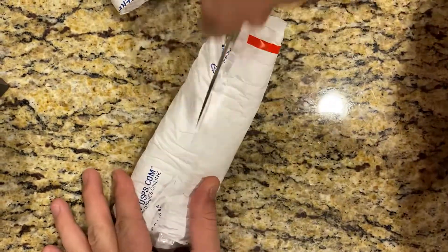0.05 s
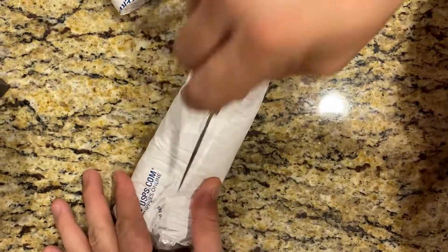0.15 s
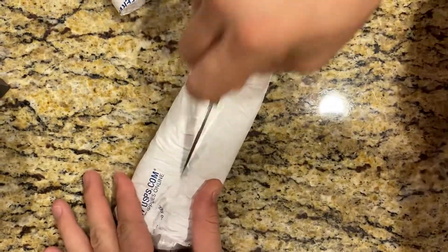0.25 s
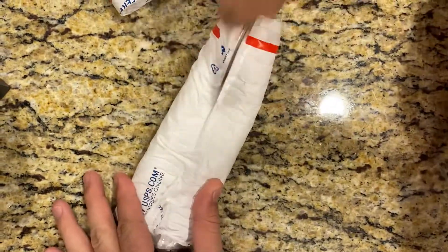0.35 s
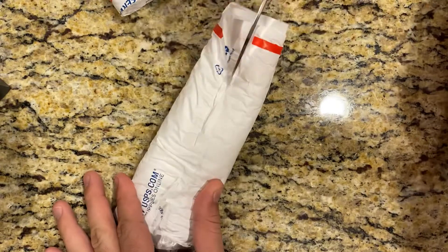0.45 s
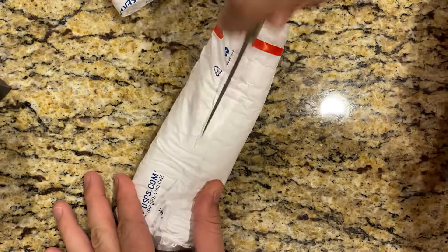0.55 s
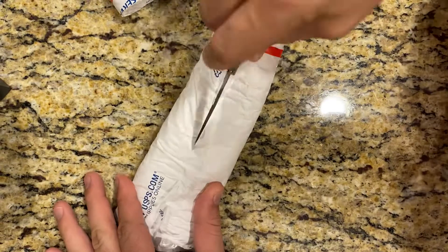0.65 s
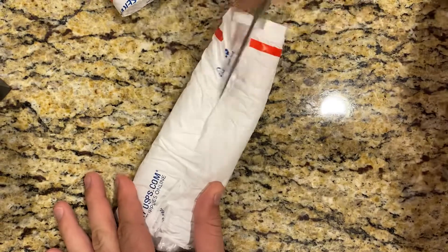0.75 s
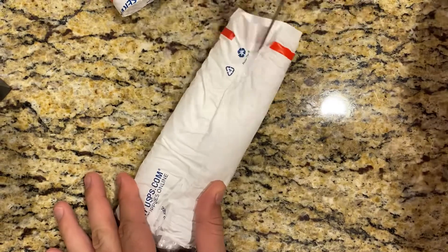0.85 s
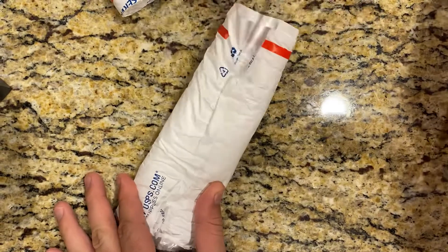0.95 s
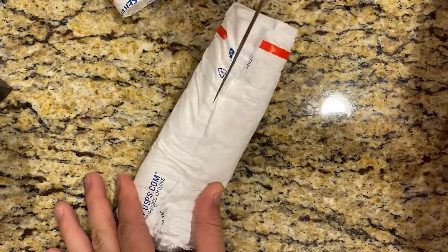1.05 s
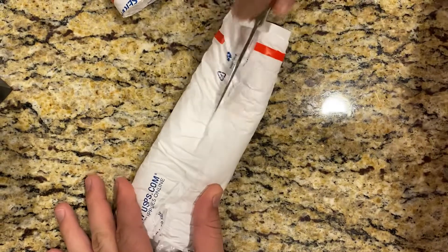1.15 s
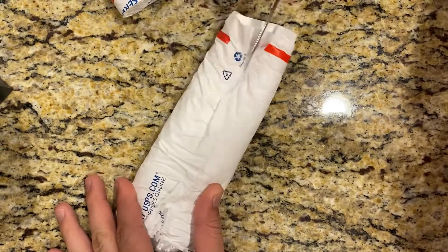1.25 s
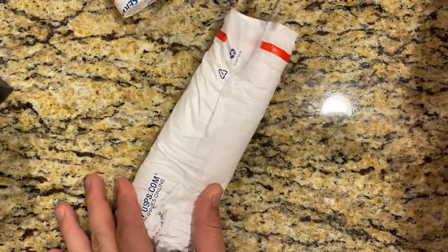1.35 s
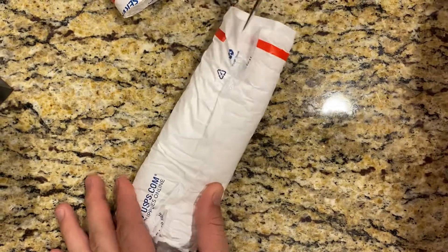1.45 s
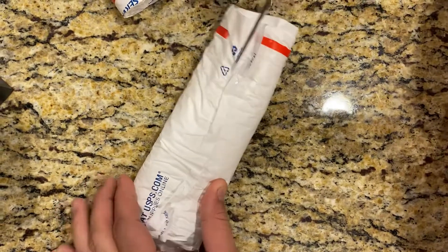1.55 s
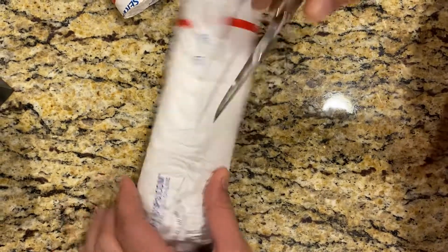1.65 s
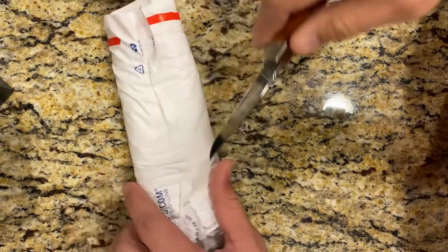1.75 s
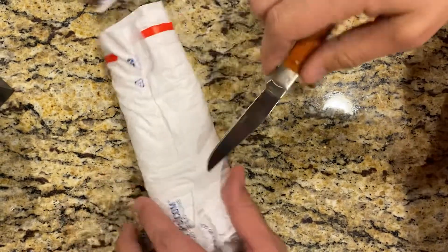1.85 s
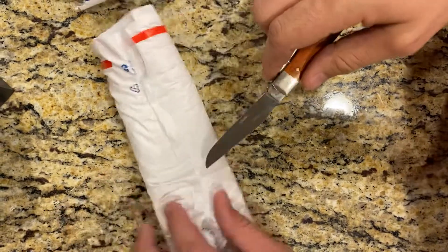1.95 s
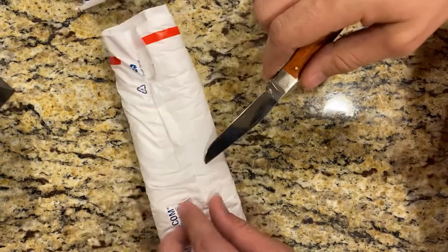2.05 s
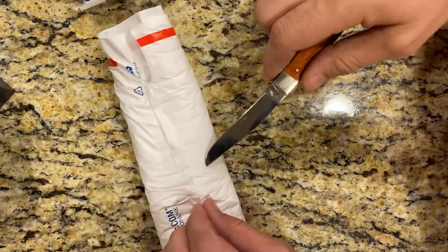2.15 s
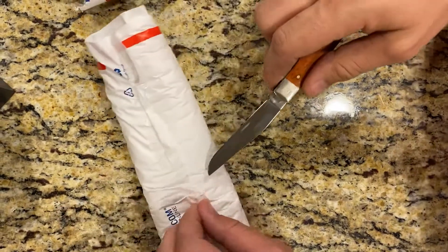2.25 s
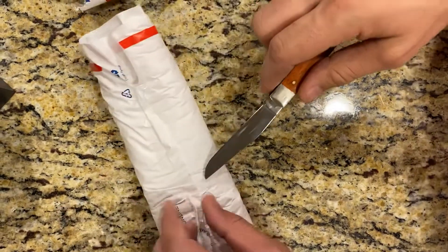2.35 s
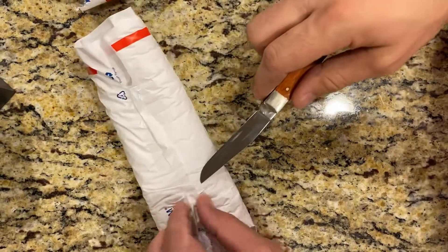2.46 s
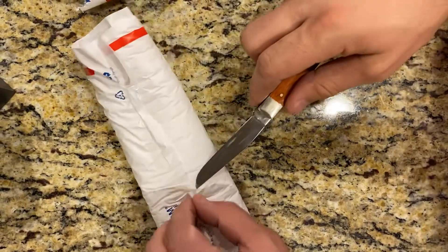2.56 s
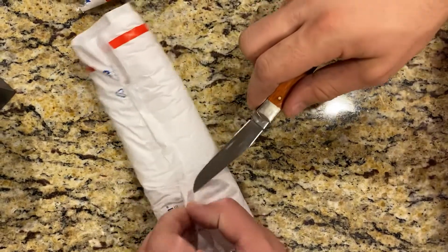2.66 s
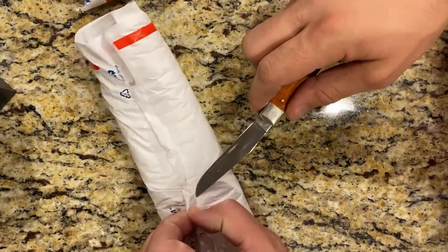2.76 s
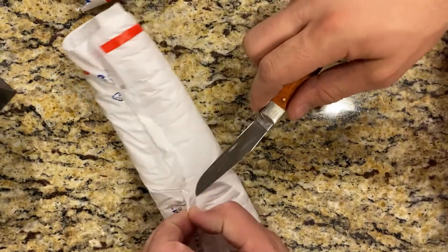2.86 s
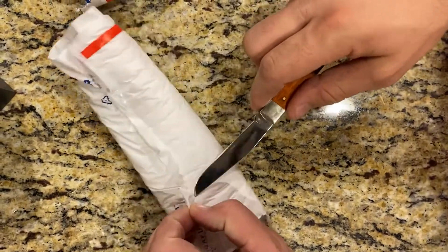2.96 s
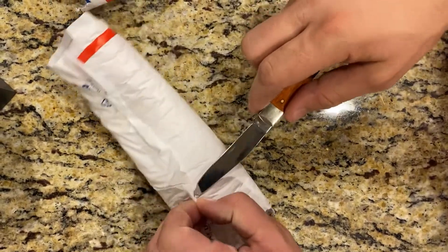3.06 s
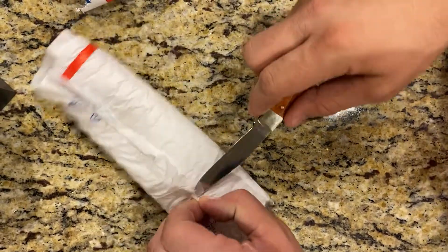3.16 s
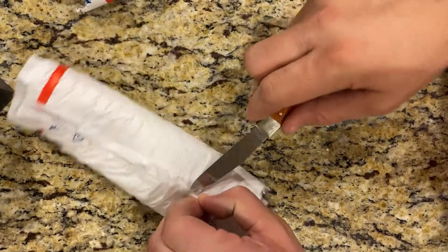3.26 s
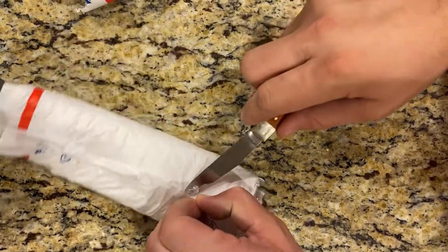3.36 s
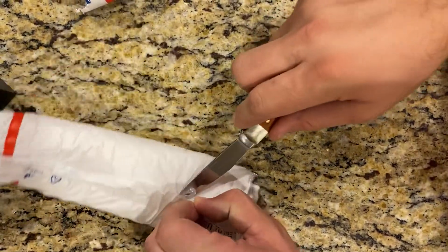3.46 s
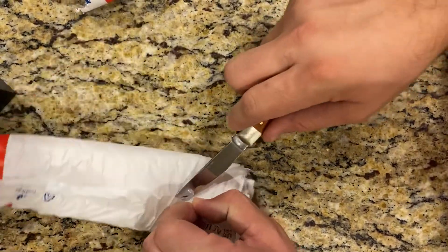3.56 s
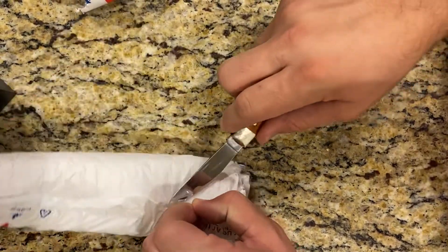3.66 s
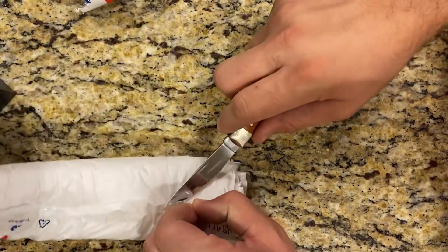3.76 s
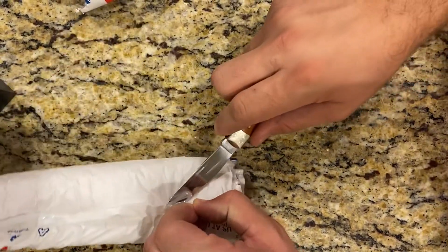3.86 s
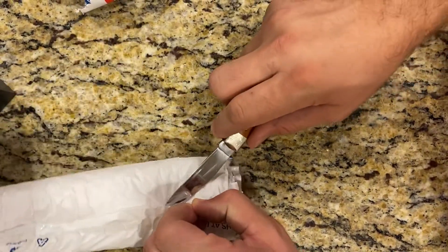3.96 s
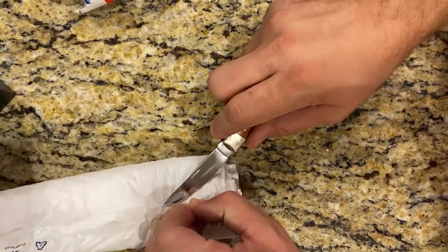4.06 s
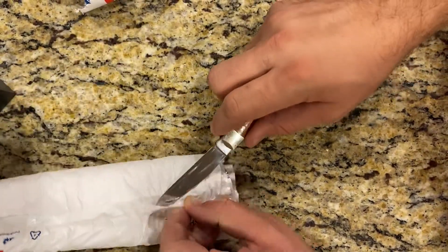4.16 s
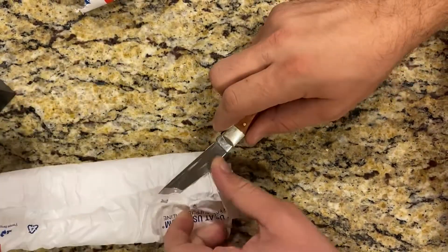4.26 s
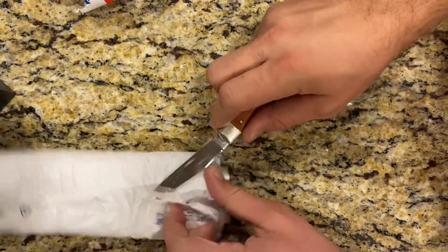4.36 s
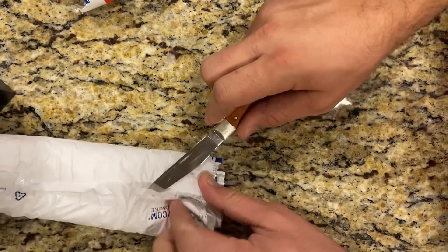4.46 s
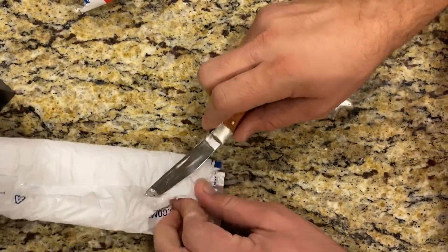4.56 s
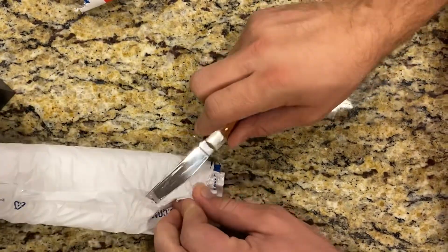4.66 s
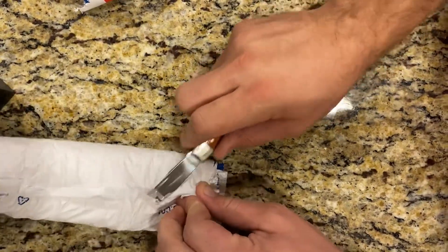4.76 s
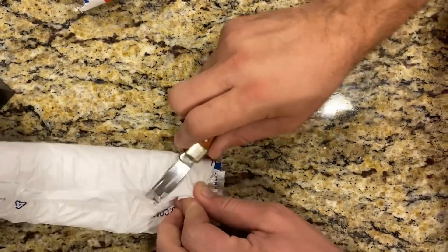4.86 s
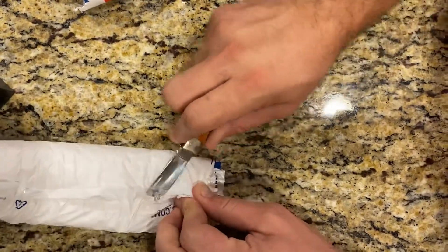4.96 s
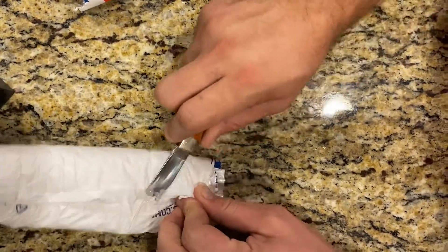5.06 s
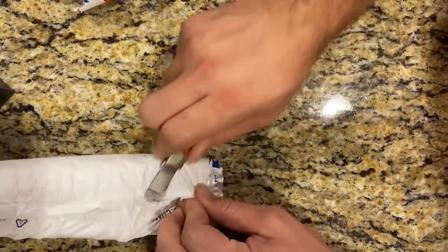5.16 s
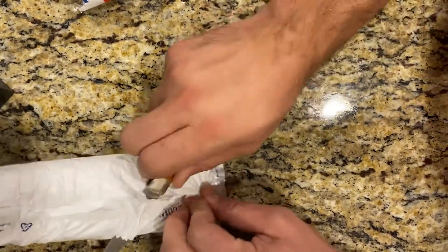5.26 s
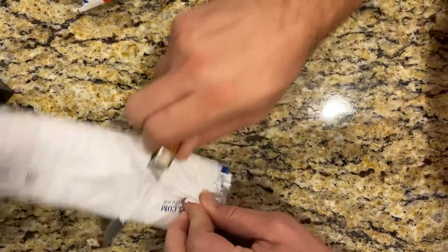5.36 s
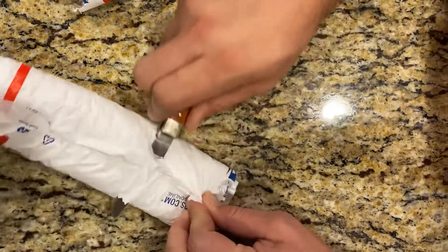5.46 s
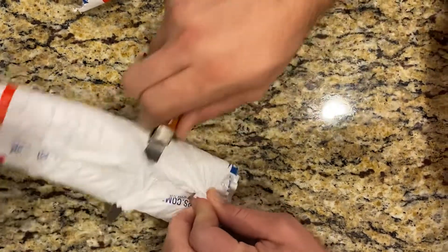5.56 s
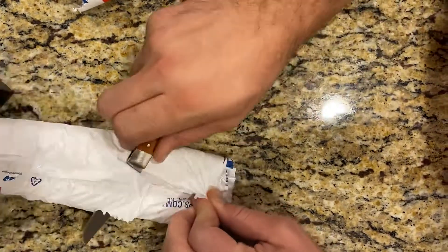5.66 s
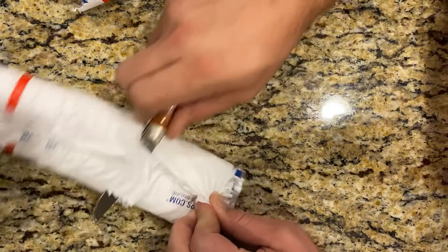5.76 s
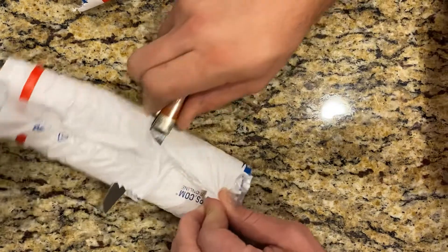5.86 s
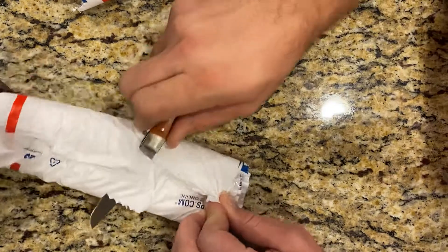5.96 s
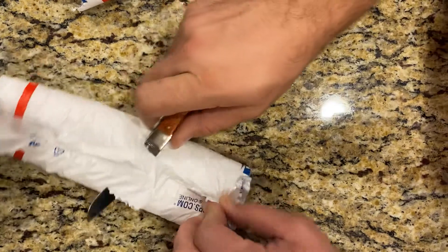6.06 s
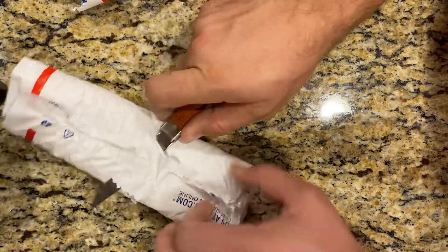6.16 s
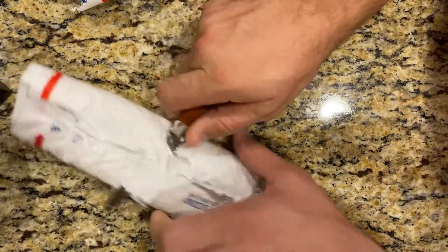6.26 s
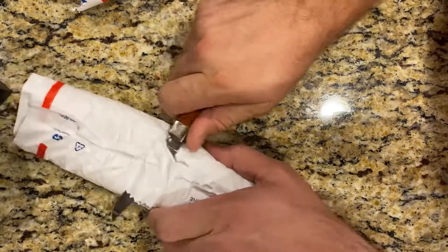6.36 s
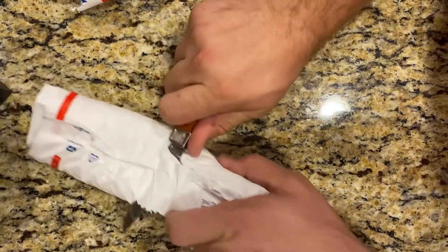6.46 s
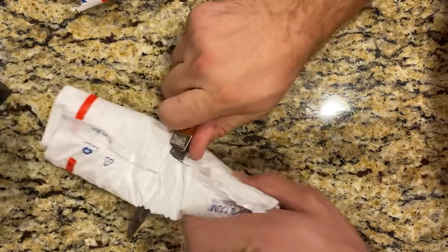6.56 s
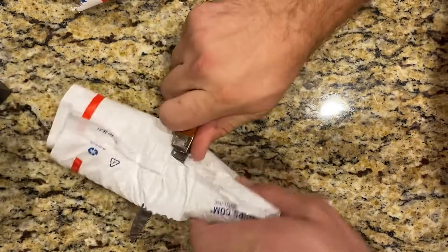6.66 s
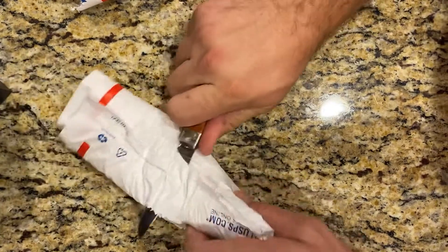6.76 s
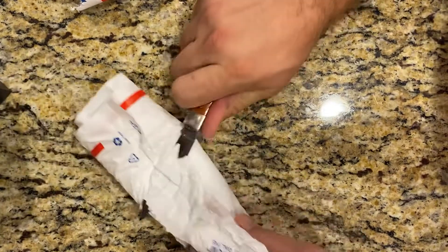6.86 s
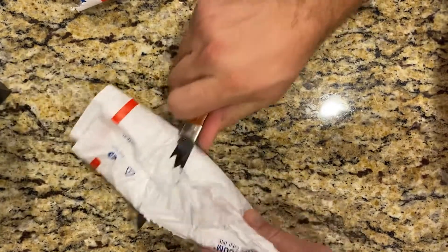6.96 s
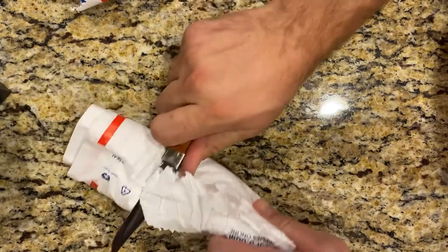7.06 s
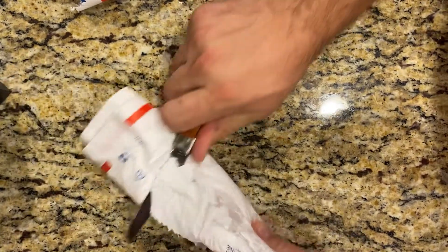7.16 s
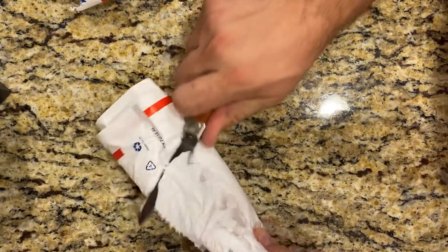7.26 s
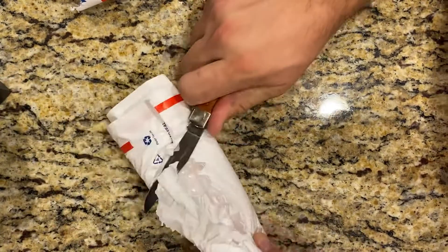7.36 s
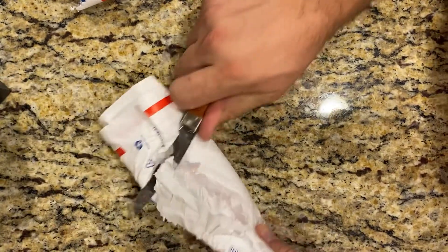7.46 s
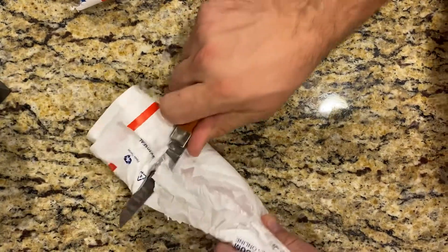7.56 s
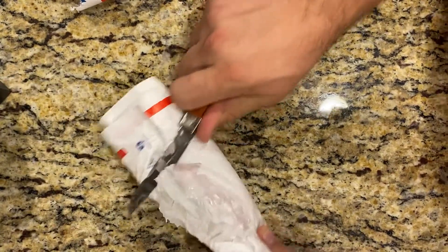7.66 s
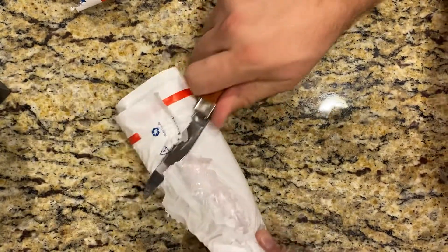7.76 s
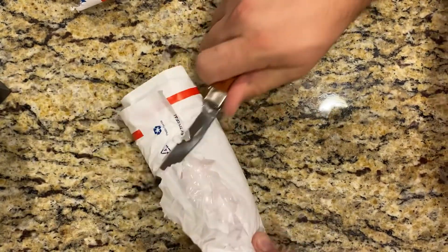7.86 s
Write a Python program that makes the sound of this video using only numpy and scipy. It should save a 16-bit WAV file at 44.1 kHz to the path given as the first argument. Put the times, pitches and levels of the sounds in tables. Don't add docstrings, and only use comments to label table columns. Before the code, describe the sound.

A padded plastic mailer is cut open on a stone kitchen counter. Brisk slicing crackles and snaps come first, then quiet sparse picking at the tape, then firmer piercing and twisting, and finally the loudest bursts as the blade saws through. Small air pockets pop throughout. Very close stereo pickup, short kitchen reverberation, and a barely audible low appliance hum.

```python
import sys
import numpy as np
from scipy import signal
from scipy.fft import rfft, irfft
from scipy.io import wavfile
from scipy.ndimage import uniform_filter1d

SR = 44100
rng = np.random.default_rng(int(sys.argv[2]) if len(sys.argv) > 2 else 0)


def materialize(psi):
    bounded = np.clip(np.atleast_2d(psi).T, -1, 1)
    quanta = np.round(bounded * 32767).astype(np.int16)
    wavfile.write(sys.argv[1], SR, quanta)


def volts(x):
    e = np.asarray(x, float) / 20
    return 10 ** e


N = 348816

# peak_s, snap_db, hollow_body_db (rel), crisp_edge_db (rel)
SLICE_SNAPS = [(.0033, -32.5, 2, -8), (0.0673, -35, -10, -26), (0.0751, -45, 2, 8.5),
               (0.1885, -33.5, 0, 2.5), (0.2606, -49.5, 8, 16), (0.304, -30, -25, -9),
               (0.3138, -23, -31, -27), (.352, -24.5, -12.5, -29), (.466, -42.5, 10, 7),
               (0.472, -40, -9, -22), (0.6304, -31.5, -9, -12), (0.6372, -37.5, 5, -7),
               (0.6506, -27, -9, -24), (0.6956, -28.5, -15, -2), (0.7148, -39, -3, 11),
               (.7287, -41, -12, -16), (0.7573, -28, -6, -18), (0.78, -37, -3, -4), (1.0985, -42.5, 3, -10),
               (1.1113, -38, 5, -8), (1.1548, -27.5, -7, -15), (1.1812, -28, -27, -11),
               (1.189, -35.5, -1, 4), (1.2075, -34, -10, -20), (1.219, -28, -8, -32),
               (1.3098, -34.5, -2.5, -1), (1.3306, -29.5, -5.5, -5), (1.3695, -33.5, -0.5, -11)]
PICK_SNAPS = [(1.642, -48.5, 13.5, 0), (1.746, -60.5, 19.5, -12), (1.9517, -37.5, 6.5, -40),
              (2.017, -45, -3, -18), (2.102, -37, -4, -13), (2.1066, -46, 1, -22), (2.154, -43, -14, 0),
              (2.3026, -48.5, 6.5, -29), (2.491, -50, 11, -16), (2.5051, -41, 4, -29), (2.586, -58, 8, -17),
              (2.6081, -33, -7, -22), (2.6418, -48, -12, 4), (2.7837, -37.5, -11.5, -19),
              (2.872, -49, -11, 10.5), (3.0614, -33, -8, 1.5), (3.1193, -46.5, -0.5, 3),
              (3.237, -61, 12, 19), (3.301, -46, -26, -2), (3.318, -46, -20, -6), (3.373, -40, -29, -7),
              (3.5502, -46.5, -22, 4.5), (3.571, -43, -6, -28), (3.6043, -40, -10, 8), (3.67, -48, -24, 1),
              (3.744, -45, 5, -10), (3.8129, -42, -4.5, -4), (3.866, -51, -30, 5), (3.949, -50, -17, 7.5)]
PIERCE_SNAPS = [(4.094, -42, -10, -1), (4.128, -33.5, -6, 7), (4.1595, -39, 7, 8), (4.1743, -49, 17.5, -6),
                (4.2083, -42.5, 0.5, -1), (4.265, -48, -19, 7.5), (4.342, -36.5, 1.5, -21),
                (4.473, -38.5, 4, 3.5), (4.54, -43, 2, 12), (4.5549, -35, -0.5, -5), (4.5988, -42, 3, 2),
                (4.6423, -38, 0, 2), (4.6548, -40.5, 5, 14.5), (4.684, -26.5, -5.5, 9.5),
                (4.7079, -28.5, -21, 9), (4.909, -29, -2.5, -14), (4.9445, -37, -10, -10),
                (4.965, -34.5, -10, -11), (5.042, -25, -38, -2), (5.0582, -36, -4, -18),
                (5.0754, -28.5, -8, -6), (5.145, -36.5, 6, 0), (5.1726, -40, 6, 5),
                (5.1793, -40.5, 11, -14), (5.241, -37, -19, 3), (5.314, -32.5, -10, -2),
                (5.4021, -31.5, 9, 8), (5.423, -34, 1.5, -14.5)]
TWIST_SNAPS = [(5.535, -32, -20, -5), (5.572, -31, 5, 5), (5.5749, -38, 18, 8.5), (5.597, -39, 16.5, -23),
               (5.6055, -28, 14.5, 5), (5.643, -45, 13, 10), (5.76, -37.5, -12, 12), (5.78, -49, -18, 24),
               (5.9101, -40.5, 8.5, -25), (5.9357, -28, 0.5, -15), (5.982, -53, 15.5, -25),
               (6.0534, -38.5, 2, -11), (6.242, -42.5, 8, -31), (6.2712, -40.5, 11, -19),
               (6.334, -36, 5, -7), (6.421, -39, -18, 8), (6.4562, -32, -2, 7), (6.4905, -24.5, -2.5, -6.5),
               (6.506, -23, -14, -28.5), (6.513, -20.5, -11, -5), (6.5306, -23, -4.5, -34),
               (6.549, -26, 0, -2)]
SAW_SNAPS = [(6.7671, -24, -10, -18), (6.772, -18.5, 2.5, -25), (6.7837, -21, -20, -29),
             (6.7926, -23, 3.5, -25), (6.8012, -18, -5, -19), (6.8171, -23, -3, -7),
             (6.8351, -21.5, 2.5, 1.5), (6.845, -20, -11, -16), (6.8538, -27, 6.5, 5.5),
             (6.928, -48, -12, 22), (6.964, -37.5, 7, 20.5), (6.972, -43, 18, 8), (7.001, -39, 10, 14.5),
             (7.0961, -33.5, -6, 7), (7.1303, -42, 9, 8), (7.198, -19, 4.5, -2.5), (7.2236, -20, -0.5, -8),
             (7.2395, -24, -1, -10), (7.247, -24, 5.5, -3.5), (7.2511, -21, -1, -17),
             (7.3601, -38.5, 7.5, 5.5), (7.4865, -25.5, -4.5, -13), (7.503, -28, -11, -2.5),
             (7.5124, -28.5, 0.5, 1), (7.537, -31, -31, 0), (7.642, -27.5, -22, 1), (7.651, -32, -2.5, 4),
             (7.699, -27.5, -5, 1), (7.7192, -29.5, -13, -10), (7.7551, -30, -8, 4), (7.845, -37, 2, 6)]
# peak_s, snap_db, hollow_body_db, crisp_edge_db
TAPE_SNAPS = [(1.054, -47, -26, 2.6), (2.8849, -55, -10, 5.8), (3.2537, -44.5, -12, 5),
              (3.5842, -51, -8, 2), (3.8827, -47, -17, 5.6)]
# peak_s, snap_db, hollow_body_db, crisp_edge_db
LONE_TICKS = [(1.813, -48, -7, -13), (2.9, -45, -12, -9), (2.958, -47, -23, -14), (3.339, -54, -20, 6),
              (3.351, -52, -16, 10), (3.385, -48, -3, -6), (3.641, -49.5, -8, 5), (3.849, -52, -15, 4),
              (4.496, -42.5, -2, -4), (6.129, -47, -12, 6), (2.704, -46.5, -4, -12)]
ALL_SNAPS = TAPE_SNAPS + SLICE_SNAPS + PICK_SNAPS + PIERCE_SNAPS + TWIST_SNAPS + SAW_SNAPS

# peak_s, effort_db, swell_s, fade_s, hollowness_db; swell and fade each span 20 dB
SLICE_STROKES = [(0.0, -35.5, .05, 0.056, -6), (0.198, -47.5, 0.018, 0.4, -1),
                 (0.317, -30, 0.097, 0.15, -8.5), (.46, -59.5, 0.37, 0.048, 15.5),
                 (0.633, -32, 0.0044, 0.028, -10), (0.733, -30.5, 0.08, 0.21, -5),
                 (.9, -41, 0.15, 0.081, -7), (1.108, -33.5, 0.019, 0.031, -4),
                 (1.195, -33, 0.09, 0.18, -6.5), (1.35, -49.5, 0.15, 0.24, 2.5)]
PICK_STROKES = [(1.678, -50.5, 0.34, 0.28, -2.5), (1.96, -49.5, 0.021, 0.12, 3.5),
                (2.093, -47, 0.14, 0.18, -3), (2.32, -51.5, 0.087, 0.27, -7), (2.49, -47.5, 0.08, 0.1, -5),
                (2.634, -46.5, 0.39, 0.18, -2), (2.963, -48, 0.2, 0.12, -5),
                (3.12, -54.5, 0.12, 0.21, -0.5), (3.397, -55, 0.45, 0.81, -5.5),
                (3.607, -54.5, 0.068, 0.14, -1), (3.83, -64.5, 0.14, 1, -4)]
PIERCE_STROKES = [(4.176, -43.5, 0.11, 0.061, -6), (4.416, -43.5, 0.25, 0.67, -5.5),
                  (4.692, -30, 0.016, 0.068, -3), (4.93, -55.5, 0.071, 0.46, -3.5),
                  (5.182, -31.5, 0.12, 0.09, -4), (5.3, -38.5, 0.072, 0.42, -6.5),
                  (5.417, -40.5, 0.19, 0.073, 1)]
TWIST_STROKES = [(5.583, -33, 0.073, 0.061, 0), (5.748, -42, 0.15, 0.12, -4), (5.928, -42, 0.13, 0.052, 2),
                 (6.136, -42.5, 0.25, 0.13, -4), (6.341, -35.5, 0.14, 1, -3)]
SAW_STROKES = [(6.526, -30, 0.049, 0.062, -5), (6.67, -43.5, 0.064, 0.45, -8),
               (6.775, -24.5, 0.0087, 0.1, -2.5), (6.836, -28, 0.041, 0.018, 6.5),
               (7.019, -32, 0.19, 0.046, -4.5), (7.13, -37, 0.12, 0.074, -10),
               (7.254, -30, 0.14, 0.1, -4.5), (7.51, -36.5, 0.17, 0.027, -3),
               (7.653, -34, 0.095, 0.097, -6.5), (7.88, -39, 0.23, 0.31, -0.5)]
# crisp_edge_db (rel), counter_thud_db (rel)
ACTION_COLOURS = [
    (-8, -8.5),
    (-4.5, -11),
    (-5, -15.5),
    (-5.5, -28),
    (-6.5, -13),
]
# level_db of thud, body, middle, edge
CREEP_DB = [-81, -91.5, -95.5, -82]

# peak_s, level_db, pitch_hz
POCKET_POPS = [(0.0095, -29, 1453), (0.068, -27.5, 2070), (0.186, -37, 1152), (0.198, -30, 1424),
               (0.2617, -24, 1122), (0.296, -26, 2330), (0.2955, -33, 387), (0.3148, -31, 4070),
               (0.316, -33, 296.6), (0.463, -31, 2800), (0.467, -34.5, 572.2), (0.6316, -29, 3600),
               (0.633, -24.5, 553), (0.6397, -25, 1980), (0.648, -25, 860), (0.6495, -29, 3540),
               (0.649, -21, 1486), (0.7293, -24, 3360), (0.7763, -32.5, 342), (0.7802, -27, 1340),
               (0.945, -31, 2840), (0.948, -33, 2300), (1.099, -25.5, 437), (1.112, -26, 1980),
               (1.1811, -21, 3020), (1.1834, -25, 780), (1.1883, -26, 5210), (1.208, -26, 391),
               (1.22, -34, 2230), (1.31, -28, 5400), (1.33, -28, 4040), (1.3302, -26, 4700),
               (1.376, -29.5, 536), (1.7474, -39, 1296), (1.9481, -27.5, 1900), (2.106, -32, 1004),
               (2.3005, -37, 614), (2.307, -33, 1870), (2.5056, -28, 1770), (2.507, -27.5, 1120),
               (2.5068, -32.5, 2320), (2.5693, -30.5, 1117), (2.61, -32.5, 557), (3.061, -29.5, 3570),
               (3.0606, -32.5, 2140), (3.1216, -32.5, 1120), (3.236, -39, 560), (3.8124, -38.5, 3960),
               (4.1605, -26.5, 739), (4.4734, -30, 1720), (4.5317, -37, 1060), (4.6839, -28, 5070),
               (4.685, -23, 3830), (4.6875, -25, 2080), (4.6898, -28, 4870), (4.69, -22.5, 1012),
               (4.7093, -18.5, 3130), (4.7083, -26, 3730), (4.7202, -22, 1800), (4.91, -26, 2070),
               (5.0417, -31, 4900), (5.042, -27.5, 3170), (5.0438, -34, 943), (5.0585, -37, 3140),
               (5.0732, -22.5, 3230), (5.073, -24.5, 4260), (5.074, -28, 950), (5.14, -28, 643),
               (5.176, -20.5, 5140), (5.1776, -23, 1810), (5.177, -23, 1072), (5.179, -30, 3570),
               (5.182, -24, 990), (5.2082, -25.5, 1810), (5.4012, -24, 3750), (5.401, -21.5, 1942),
               (5.4243, -29, 2100), (5.4445, -32, 1660), (5.5773, -29, 3360), (5.599, -38, 2210),
               (5.6052, -16, 2140), (5.6056, -20, 5420), (5.9118, -29, 1027), (6.1979, -33, 998),
               (6.2413, -31, 1930), (6.336, -20.5, 820), (6.4913, -17, 1350), (6.514, -14, 1826),
               (6.5155, -22, 1007), (6.5294, -14, 4950), (6.529, -13.5, 1282), (6.5477, -13, 1213),
               (6.6145, -27, 2150),
               (6.772, -12.5, 2340), (6.7836, -23.5, 2250), (6.7932, -8.5, 976), (6.793, -19, 2410),
             (6.791, -14, 3386), (6.7965, -14, 300), (6.799, -24, 690), (6.807, -37, 3500),
             (6.818, -21, 5170), (6.8361, -18, 5130), (6.8363, -10.5, 2350), (6.837, -8, 1160),
             (6.82, -13, 1100), (6.847, -15, 1030), (6.854, -19, 2530), (6.8553, -21.5, 5480),
             (6.9653, -12, 1075), (6.975, -25, 950), (6.9755, -23, 1810), (7.0003, -21, 1107),
             (7.023, -21, 960), (7.035, -25.5, 720), (7.097, -26, 4570), (7.124, -27, 4520),
             (7.1234, -29, 2020), (7.131, -27, 4740), (7.1304, -25, 4320), (7.131, -30, 819),
             (7.196, -19.5, 2500), (7.21, -25, 750), (7.2236, -15.5, 4940), (7.248, -18, 3320),
             (7.2515, -22, 4560), (7.486, -26, 3030), (7.501, -30, 2300), (7.6508, -20.5, 1120),
             (7.6511, -28, 3700), (7.6566, -30, 2450), (7.699, -18.5, 3610), (7.6995, -20, 1030),
             (7.72, -22, 1108), (7.847, -26.5, 4620), (7.8603, -19.5, 1033)]

# freq_hz, level_db
FILM_COLOUR = [(50, -39), (130, -12), (300, -1.5), (480, -6), (1050, 0), (1700, -2), (2200, -1),
               (2700, -4.5), (5000, -3), (7000, -2.5), (10000, -6.5), (15300, -10), (16200, -39),
               (17000, -45)]
# pitch_hz, width_hz, level_db
POCKET_RINGS = [(592, 135, 4), (1005, 380, -5), (2410, 210, -0.5)]
# freq_hz, right_phase_rad, right_level_db, unshared_part (0-1)
PORTS = [(0, 0, -.9, .03), (130, .06, 0, .02), (350, .12, 0, .05), (700, .12, -1.3, .07),
         (1200, .5, -2.5, .2), (1900, .1, -.3, .1), (2350, .3, 2, .33), (2620, -.7, 3.3, .75),
         (3300, -.7, 1.5, .45), (4900, -.23, .8, .33), (5700, -1.2, 0, .25), (7300, -3.14, 0, .2),
         (13600, -9.42, 0, .24), (16500, -12.4, 0, .3)]
# freq_hz, t60_s
KITCHEN_DECAY = [(250, 0.54), (900, 0.41), (6000, 0.31), (14000, 0.015)]
# time_s, level_db
HUM_LEVEL = [(0.0, -77), (0.769, -64.5), (4.25, -66), (4.7, -75), (5.2, -64), (5.65, -61.5), (6.14, -72.5),
             (7.14, -61), (7.91, -65.5)]
# freq_hz, level_db
HUM_COLOUR = [(30, -10), (80, 5), (150, -4), (300, -2.5), (600, -61), (3000, -64)]

GRAIN, LEAD = 1024, 200
THUD_HZ, BODY_HZ, EDGE_HZ = 500, 1500, 6800
PRESS, CRISP = 0.77, 0.15
POP_S, POP_CYCLES = 0.00078, 0.42
POP_RISE, POP_SAG = 0.83, 27
ROOM_DB = -19


def snaps(table):
    out = np.zeros(N + GRAIN)
    shapes = creases(count=len(table), slips=1.2, spread_s=.0011, shiver_db=-21, shiver_s=0.0019, bend_s=.0013)
    power = uniform_filter1d(shapes ** 2, size=66)
    thuds, bodies = hands(np.transpose(table)[0])[:2]
    for (s, db, body_db, edge_db), shape, p, thud, body in zip(table, shapes, power, thuds, bodies):
        zone_db = np.array([body_db + thud - body + 0.5, body_db, 0, edge_db])
        gain = volts(db + zone_db) / np.sqrt(p.max(-1))
        add(out, s + (GRAIN - p[2].argmax()) / SR, gain @ shape)
    return out[GRAIN:]


def creases(count, slips, spread_s, shiver_db, shiver_s, bend_s):
    t = (np.arange(GRAIN) - LEAD) / SR
    hz = np.fft.rfftfreq(GRAIN, 1 / SR)
    luck = rng.random((count, GRAIN + 4))
    noise = rng.standard_normal((count, GRAIN))
    slip = noise * (luck[:, 4:] < slips / (spread_s * SR)) * np.exp(-np.maximum(t, -2.2 * t) / spread_s)
    slip[:, LEAD] = np.sign(noise[:, 0]) * 1.39
    shiver = volts(shiver_db) * noise[:, ::-1] * np.exp(-np.maximum(t, -1.6 * t) / shiver_s)
    path_s = bend_s * (.5 + luck[:, :1])
    bend = np.exp(-4j * np.pi * path_s * (np.sqrt(1000 * hz) - 0.12 * hz))
    squeeze = 1 + 0.65 * (luck[:, 1:4].T[..., None] - .5)
    ring = 1
    for (pitch, width, db), q in zip(POCKET_RINGS, squeeze):
        ring = ring + volts(db) * 2 * luck[:, -1:] * width / (width + 2j * (hz - pitch * q))
    tilt = (1 + hz / 3000) ** (2 * luck[:, -2:-1] - 1)
    z = rfft(slip + shiver) * bend * ring * tilt * volts(read(FILM_COLOUR, hz))
    return irfft(z[:, None] * zones(hz)) * signal.windows.tukey(GRAIN, .2)


def zones(hz):
    thud, body, middle = (1 / (1 + (hz / f) ** 4) for f in (THUD_HZ, BODY_HZ, EDGE_HZ))
    return np.array([thud, body - thud, middle - body, 1 - middle])


def hands(t):
    grid = np.arange(0, N / SR + .01, .002)
    power = volts(2 * np.array(CREEP_DB))[:, None] * np.ones(len(grid))
    actions = (SLICE_STROKES, PICK_STROKES, PIERCE_STROKES, TWIST_STROKES, SAW_STROKES)
    for strokes, (edge_db, thud_db) in zip(actions, ACTION_COLOURS):
        for s, db, swell, fade, hollow_db in strokes:
            shape = db - 20 * np.maximum((s - grid) / swell, (grid - s) / fade)
            rel = np.array([thud_db + PRESS * (db + 28.5), hollow_db, 0, edge_db - CRISP * hollow_db])
            power = power + volts(2 * (shape + rel[:, None]))
    return np.array([np.interp(t, grid, 10 * np.log10(p)) for p in power])


def crackle(per_s, scatter_db, clump_db):
    shapes = creases(count=15, slips=1.0, spread_s=0.00032, shiver_db=-15.0, shiver_s=0.0034, bend_s=0.00098)
    shapes = shapes * volts(2.88 * rng.standard_normal((len(shapes), 4, 1)))
    size = volts(scatter_db * np.minimum(rng.exponential(1, N), 3) + clump_db * wander(size=350))
    size = size * (rng.random(N) < per_s / SR)
    which = rng.integers(0, len(shapes), N)
    bed = 0
    for k, shape in enumerate(shapes):
        hits = (size * (which == k))[None]
        bed = bed + signal.oaconvolve(hits, shape, axes=1)[:, :N]
    level_db = hands(np.arange(N) / SR) + [[-1.2], [-1.2], [-1.2], [.3]]
    return (evened(bed) * volts(level_db)).sum(0)


def pops():
    out = np.zeros(N + GRAIN)
    t = np.arange(-GRAIN // 2, GRAIN // 2) / SR
    for s, db, hz in POCKET_POPS:
        width = (POP_S + POP_CYCLES / hz) * np.where(t < 0, POP_RISE, 1)
        turns = hz * (s + t - POP_SAG * t ** 2 / 2)
        add(out, s, volts(db - 1.5) * np.exp(-.5 * (t / width) ** 2) * np.sin(2 * np.pi * turns))
    return out[GRAIN // 2:][:N]


def scattered(x):
    z = signal.stft(x, nperseg=256)[2]
    turn = rng.random((z.shape[1], 1)) + uniform_filter1d(rng.standard_normal(z.T.shape), size=8)
    return signal.istft(z * np.exp(2j * np.pi * turn.T), nperseg=256)[1][:N]


def tail(x, start_s, shorten):
    taps = rng.standard_normal(SR // 2) * (np.arange(SR // 2) > start_s * SR)
    hz, t, z = signal.stft(taps, SR, nperseg=128)
    decay = volts(-60 * t / (shorten * read(KITCHEN_DECAY, hz))[:, None])
    taps = signal.istft(z * decay, SR, nperseg=128)[1]
    return signal.fftconvolve(x, taps / np.linalg.norm(taps))[:N]


def hum():
    s, db = np.transpose(HUM_LEVEL)
    z = rfft(rng.standard_normal(N)) * volts(read(HUM_COLOUR, np.fft.rfftfreq(N, 1 / SR)))
    level_db = np.interp(np.arange(N) / SR, s, db) + 2.5 * wander(size=3000)
    return evened(irfft(z, N)) * volts(level_db)


def wander(size):
    return evened(uniform_filter1d(uniform_filter1d(rng.standard_normal(N), size), size))


def evened(x):
    return x / np.sqrt(np.mean(x ** 2, -1, keepdims=True) + 1e-20)


def read(points, hz):
    f, value = np.transpose(points)
    return np.interp(np.log(hz + 1), np.log(f + 1), value)


def add(mix, s, sound):
    part = mix[round(s * SR):][:len(sound)]
    part += sound[:len(part)]


def scene():
    film = snaps(ALL_SNAPS) + pops() + crackle(per_s=1500, scatter_db=4.0, clump_db=0.43)
    room = sum(tail(film * wander(size=900), start_s=0.0054, shorten=0.62) for _ in range(2))
    film = film + snaps(LONE_TICKS)
    far = volts(ROOM_DB) * room + hum()
    shared = rfft(film + far)
    apart = rfft(scattered(film + 3 * far))
    f, phase, db, loose = np.transpose(PORTS)
    hz = np.fft.rfftfreq(N, 1 / SR)
    phase, db, loose = (np.interp(hz, f, v) for v in (phase, db, np.clip(loose, 0, 1)))
    left = shared + loose * apart
    right = (shared - loose * apart) * volts(db) * np.exp(1j * phase)
    return irfft(np.array([left, right]) / np.hypot(1, loose), N)


def low_pass(x):
    return signal.sosfilt(signal.butter(12, 16800, fs=SR, output="sos"), x)


def record(dry):
    return low_pass(dry)


dry = scene()
out = record(dry)
materialize(out)
```